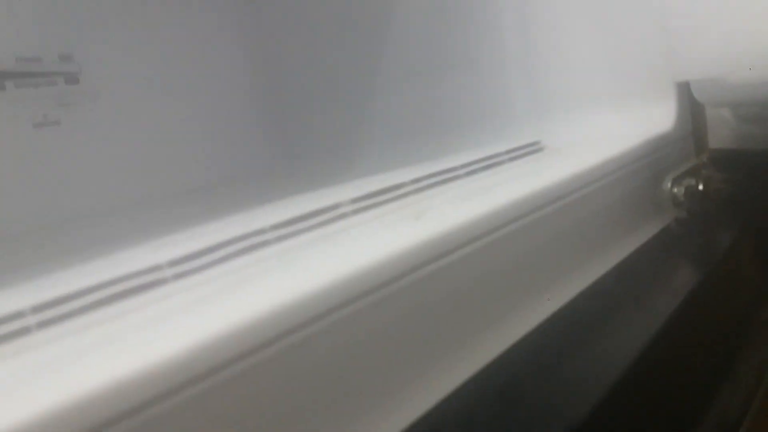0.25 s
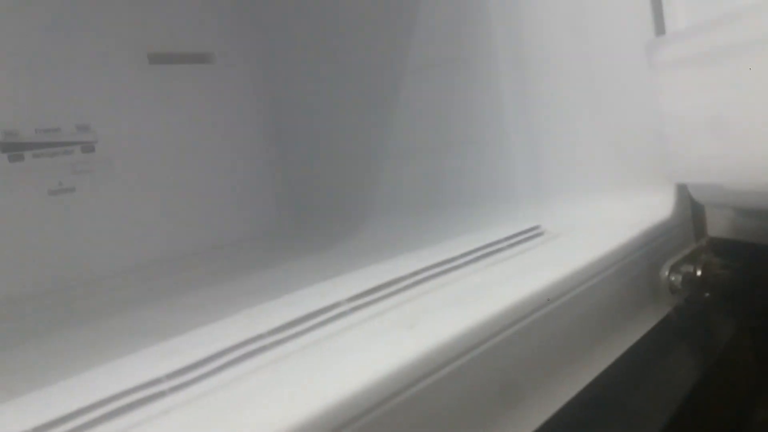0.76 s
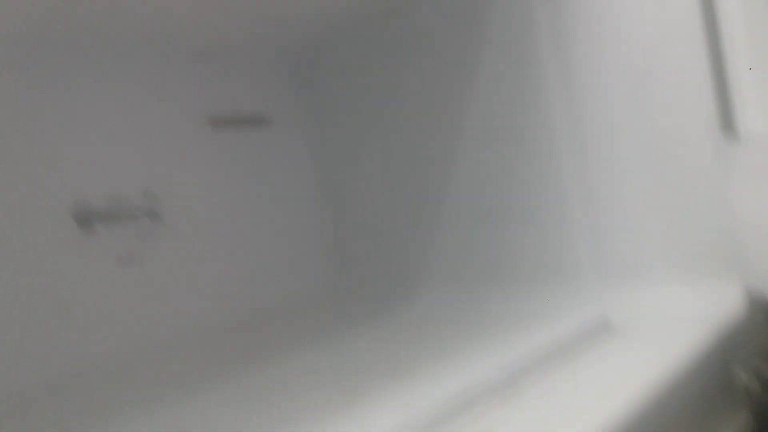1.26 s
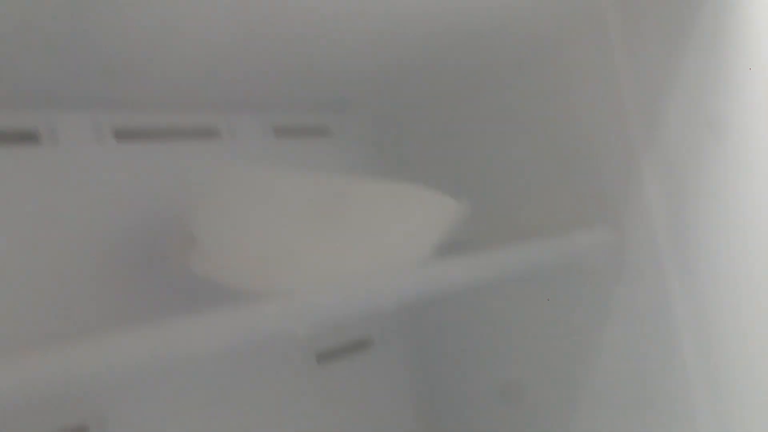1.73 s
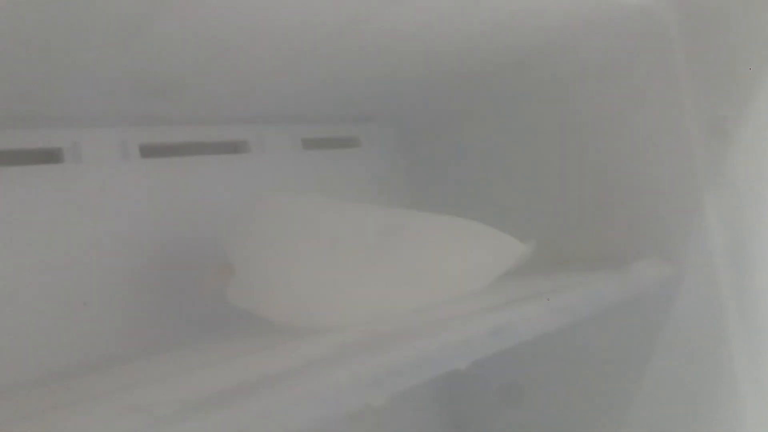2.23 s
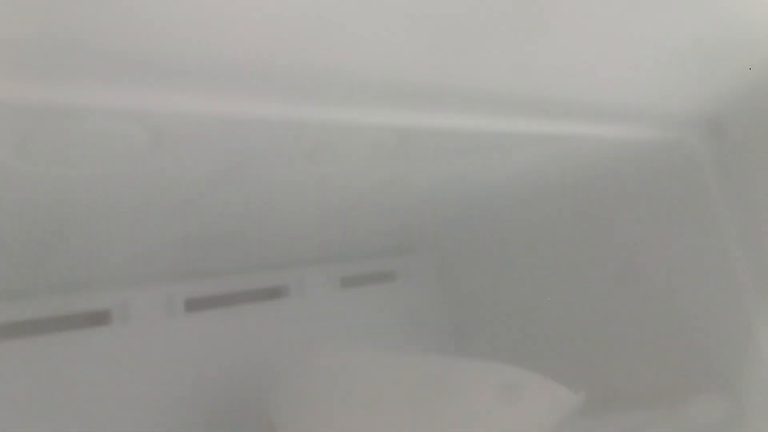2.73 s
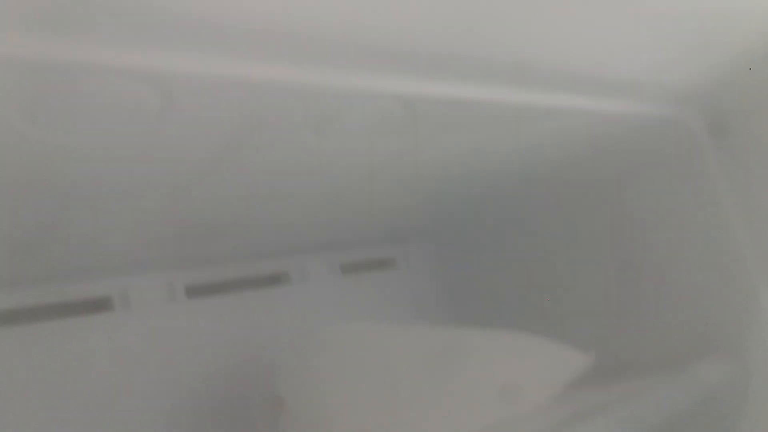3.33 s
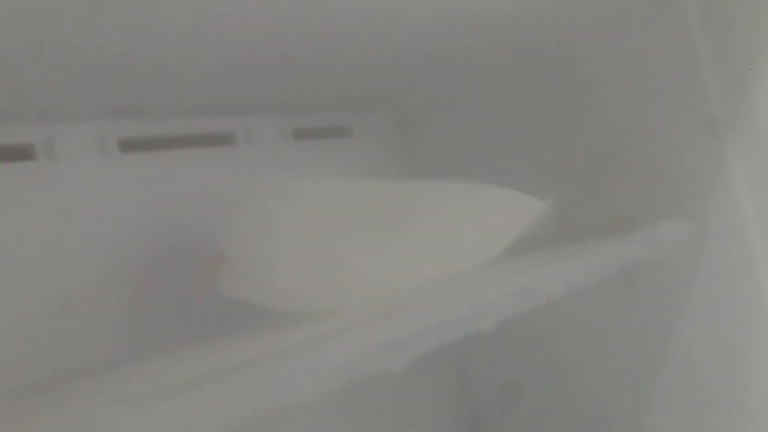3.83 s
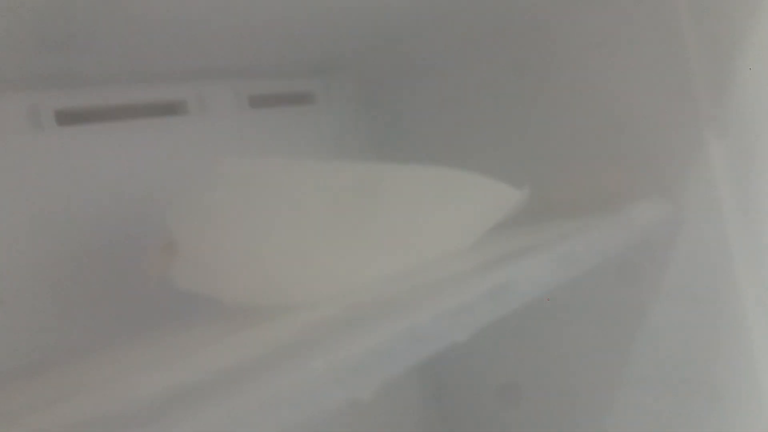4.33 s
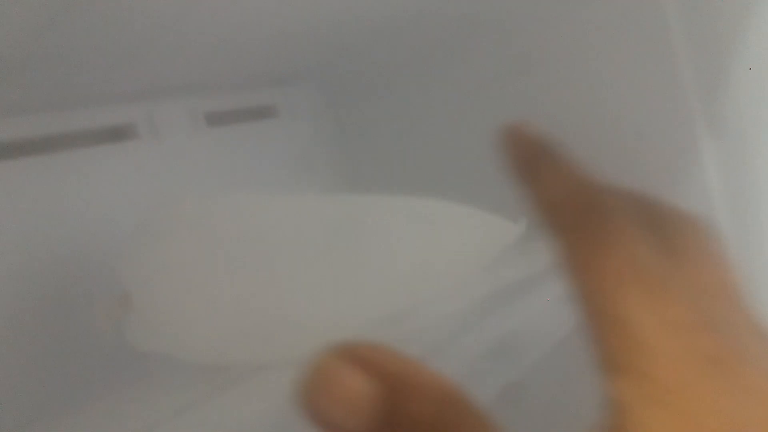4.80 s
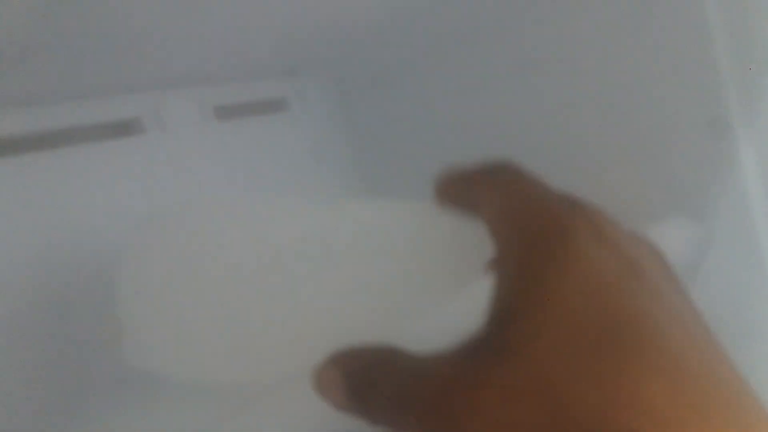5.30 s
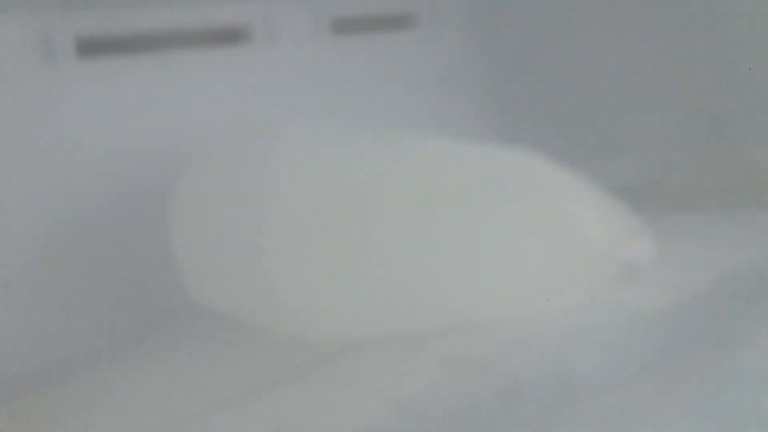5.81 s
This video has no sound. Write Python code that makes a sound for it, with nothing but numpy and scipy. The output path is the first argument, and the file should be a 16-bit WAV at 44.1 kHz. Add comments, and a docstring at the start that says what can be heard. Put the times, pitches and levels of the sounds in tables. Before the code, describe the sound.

A refrigerator hums steadily while plastic clicks and cloth rustles; near the end, a hand crunches frost and knocks a frozen lump against a shelf.

```python
"""A refrigerator's compressor hums through the standing waves of its open cabinet in a kitchen.
A fan drones and pushes rumbling air out of the vents as the listener moves from the door sill
into the freezer box and back. A sleeve rustles by friction with each move, and plastic clicks.
Near the end a hand grips a frozen lump: frost fractures, skin sticks and slips in short squeaks,
and the lump's knocks excite the modes of the shelf."""
import sys
import numpy as np
from scipy import signal
from scipy.fft import rfft, irfft, next_fast_len
from scipy.io import wavfile

SR = 44100
rng = np.random.default_rng(int(sys.argv[2]) if len(sys.argv) > 2 else 0)


def pcm_store(signal):
    """Save signal as 16-bit PCM."""
    levels = np.round(np.clip(np.atleast_2d(signal), -1, 1) * 32767)
    wavfile.write(sys.argv[1], SR, levels.astype(np.int16).T)


N = 267113
TIME = np.arange(N) / SR


def from_db(db):
    """Amplitude ratio of a level in decibels."""
    return 10 ** (np.asarray(db) / 20)


def in_time(rows):
    """Linear interpolation of each column after the time column, sample by sample."""
    times, *columns = np.transpose(rows)
    return [np.interp(TIME, times, column) for column in columns]


def drift(knots_per_s):
    """Random modulation: straight lines between Gaussian values of spread 1."""
    knots = rng.standard_normal(N // 10)
    return np.interp(TIME * knots_per_s, np.arange(len(knots)), knots)


def coloured(excitation, spectrum):
    """Source and filter: a spectral envelope shapes the excitation; the result has rms 1."""
    hz, level_db = np.transpose(spectrum)
    size = next_fast_len(N)
    log_hz = np.log(np.maximum(np.arange(size // 2 + 1) * SR / size, 1))
    gain = from_db(np.interp(log_hz, np.log(hz), level_db, right=-np.inf))
    shaped = irfft(rfft(excitation, size) * gain, size)[:N]
    return shaped / np.sqrt(np.mean(shaped ** 2) + 1e-20)


def noise(spectrum):
    """Filtered Gaussian noise of rms 1."""
    return coloured(rng.standard_normal(N), spectrum)


def decay(start_s, t60_s, rise_s):
    """Exponential decay after a quick rise."""
    age = np.maximum(TIME - start_s, 0)
    return (1 - np.exp(-age / rise_s)) * np.exp(-np.minimum(np.log(1000) * age / t60_s, 20))


def gestures(rows, swell_db=7.5, catch_s=0.016):
    """Incoherent sources add in power: the joint gain of gestures that catch, swell and fade."""
    power = np.zeros(N)
    for start_s, swell_s, peak_db, fade_db_per_s in rows:
        age = np.maximum(TIME - start_s, 0)
        level_db = peak_db - swell_db * np.maximum(1 - age / swell_s, 0)
        level_db -= fade_db_per_s * np.maximum(age - swell_s, 0)
        power += (from_db(level_db) * np.minimum(age / catch_s, 1)) ** 2
    return np.sqrt(power)


# Shaft rotation: time_s, speed_hz
SHAFT_SPEED = [(0, 49.165), (1.2, 49.2), (6.06, 49.222)]
# Harmonics that fill the cabinet: shaft_multiple, sill_level_db
HUM_HARMONICS = [(3, -35.5), (4, -43.5), (6, -61.5), (9, -58), (12, -61.5), (15, -77), (18, -78),
                 (20, -71.5), (21, -68), (22, -70), (26, -76), (27, -73)]
# Standing waves: shaft_multiple (rounded in use), spot_level_db, spot_place, loss_db_per_place
STANDING_WAVES = [(7.986, -45, .1, 2.0), (16.02, -58, .1, -0.3), (23.96, -59.5, 1.08, 9),
                  (28.02, -54, 2.23, 5), (30, -73, 0, 9), (34.2, -71, 1.6, 9), (48, -72.5, 2.1, 7)]

def compressor(place, level_db, waver_db, flutter, inward_db_per_place=1.5):
    """Periodic motion radiates shaft harmonics; standing waves make their levels depend on place."""
    speed_hz, = in_time(SHAFT_SPEED)
    turns = np.cumsum(speed_hz * (1 + flutter * drift(7.97))) / SR
    partials = [(multiple, sill_db + inward_db_per_place * place) for multiple, sill_db in HUM_HARMONICS]
    for multiple, spot_db, spot, loss_db in STANDING_WAVES:
        partials.append((multiple, spot_db - loss_db * np.abs(place - spot)))
    out = np.zeros(N)
    for multiple, here_db in partials:
        amplitude = np.sqrt(2) * from_db(level_db + here_db + waver_db * drift(2.3))
        out += amplitude * np.sin(2 * np.pi * (round(multiple) * turns + rng.random()))
    return out


# Fan tone: time_s, level_db
FAN_DRONE = [(0, -44), (.8, -40.5), (1.3, -41), (1.8, -42.5), (3.3, -43), (3.85, -41.5), (4.15, -37),
             (4.8, -36), (6.06, -36.5)]
# Air from the vents: time_s, rumble_db, rush_db
AIRFLOW = [(0, -39, -45.5), (1.5, -37, -43.5), (2.2, -36.5, -46.5), (3.2, -35.5, -47.5),
           (4.2, -36.5, -46.5), (4.9, -35, -45), (6.06, -31, -42)]
# Spectra of the cabinet's rumble and of the rush at two places: frequency_hz, density_db
RUMBLE_SPECTRUM = [(20, -45), (42, -39), (50, -25.5), (57, -12), (68, -27.5), (90, -26), (102, -17.5),
                   (117, 0), (132, -2), (143, 0), (165, -5), (215, -9.5), (243, -19), (275, -13.5),
                   (370, -20.5), (600, -43)]
SILL_RUSH_SPECTRUM = [(200, -15.5), (290, 3), (400, 0), (530, 3), (620, -9.5), (1000, -11), (1400, -15.5),
                      (1600, -21.5), (2700, -28), (4200, -31), (6200, -27.5), (8000, -40.5), (10000, -48),
                      (16000, -51)]
INNER_RUSH_SPECTRUM = [(200, -11.5), (290, -2.5), (370, 1), (500, -2.5), (620, -4), (1000, -8.5),
                       (1400, -14.5), (2200, -17), (2900, -24.5), (4200, -27), (6200, -25.5), (8000, -36.5),
                       (10000, -47), (16000, -49)]

def fan(place, pitch_hz, waver_db):
    """Rotation gives a tone and airflow broadband noise: a rumble, and a rush brighter near the vents."""
    drone_db, = in_time(FAN_DRONE)
    rumble_db, rush_db = in_time(AIRFLOW)
    drone = from_db(drone_db + waver_db * drift(12)) * np.sqrt(2) * np.sin(2 * np.pi * pitch_hz * TIME)
    inside = np.clip(place, 0, 1)
    rush = np.sqrt(1 - inside) * noise(SILL_RUSH_SPECTRUM) + np.sqrt(inside) * noise(INNER_RUSH_SPECTRUM)
    return drone + from_db(rumble_db) * noise(RUMBLE_SPECTRUM) + from_db(rush_db) * rush


# Sleeve and hand sliding: start_s, swell_s, peak_db, fade_db_per_s
ARM_MOVES = [(-.1, .1, -59.5, 23), (.38, .07, -59.5, 41), (.92, 0.19, -50.5, 13), (1.301, .1, -60, 28),
             (2.145, 0.044, -48.5, 21), (2.34, 0.2, -41, 41), (3.22, 0.18, -46.5, 23.5),
             (3.97, 0.093, -47, 77), (4.18, .07, -41, 70), (5.03, .1, -43, 36), (5.2, 0.22, -38, 67),
             (5.6, 0.14, -51.5, 13), (5.86, 0.025, -48.5, 90)]
# Spectra of the rustle and of the hiss that fast sliding adds: frequency_hz, density_db
RUSTLE_SPECTRUM = [(400, -2.5), (1000, -6.5), (2200, -4.5), (3400, -5), (4600, -3), (5600, 2), (6700, 1),
                   (8000, -7), (10000, -17.5), (13000, -23), (16000, -30)]
SWISH_SPECTRUM = [(1000, -1.5), (2500, -4.5), (4500, -4), (6500, 4), (9000, -1), (12000, -6.5),
                  (16000, -15)]

def sleeve(level_db, catch_db, swish_db, swish_power):
    """Sliding friction: tiny slips of cloth and skin merge into a hiss that brightens with speed."""
    friction = gestures(ARM_MOVES) * from_db(catch_db * drift(120))
    speed = friction / from_db(max(peak_db for _, _, peak_db, _ in ARM_MOVES))
    rustle = from_db(level_db) * noise(RUSTLE_SPECTRUM)
    swish = from_db(swish_db) * speed ** swish_power * noise(SWISH_SPECTRUM)
    return friction * (rustle + swish)


# Snaps of plastic and frost: start_s, strength_db, t60_s, body_share_db, edge_share_db
SNAPS = [(1.3688, -20.5, 0.028, -6, -3), (1.3713, -29.5, 0.032, 5, 1), (2.178, -45.5, .03, -4, 4),
         (3.896, -32.5, 0.032, 3, -6), (4.127, -31.5, 0.035, 2.5, -11), (4.977, -45, 0.044, 6, 2),
         (5.010, -44, 0.032, 1, 10), (5.062, -35, 0.044, 0.5, -11), (5.084, -34, .03, -6, 0),
         (5.092, -30.5, 0.039, -16, 6.5), (5.127, -26, .035, -17, -10), (5.169, -36.5, 0.028, -1, -3),
         (5.2112, -24, 0.037, -10, -15), (5.256, -31, .04, -20, 10), (5.32, -33, 0.069, -8, 4),
         (5.325, -31, 0.063, 1, 6.5), (5.4735, -27, 0.1, -7, 2.5), (5.482, -28.5, 0.076, -3, -6),
         (5.504, -32.5, 0.076, 2, 8), (5.526, -37, 0.056, 10, 0), (5.644, -50, .03, -8, 10),
         (5.794, -33.5, 0.073, -5.5, 3), (5.799, -31.5, 0.061, -2, 0), (5.885, -46.5, 0.033, -4, 7),
         (5.904, -41.5, .03, -2, -1)]
# Spectra of a snap's bright ring, duller body and crisp edge: frequency_hz, density_db
RING_SPECTRUM = [(1500, -21), (3000, -14.5), (4600, -7.5), (5600, 5), (7000, 1.5), (8500, -9.5),
                 (11000, -29), (16000, -40)]
BODY_SPECTRUM = [(200, -22), (350, 3.5), (800, -9.5), (1400, -1), (1800, -2.5), (2300, -11), (3000, -5),
                 (4500, -3.5), (8000, -34)]
EDGE_SPECTRUM = [(5000, -13), (8000, 2), (10000, -1), (12000, -3.5), (16000, -20)]

def clicks(ring_db, body_db, edge_db, chatter_db, rise_s):
    """Modal overlap: chattering contacts excite dense, damped modes that blend into a noise burst."""
    ring_power, body_power, edge_power = np.zeros((3, N))
    for start_s, strength_db, t60_s, body_share_db, edge_share_db in SNAPS:
        snap = from_db(strength_db) * decay(start_s, t60_s, rise_s)
        ring_power += snap ** 2
        body_power += (snap * from_db(body_share_db)) ** 2
        edge_power += (snap * from_db(edge_share_db)) ** 2
    ring = from_db(ring_db) * np.sqrt(ring_power) * noise(RING_SPECTRUM)
    body = from_db(body_db) * np.sqrt(body_power) * noise(BODY_SPECTRUM)
    edge = from_db(edge_db) * np.sqrt(edge_power) * noise(EDGE_SPECTRUM)
    return (ring + body + edge) * from_db(chatter_db * drift(900))


def freezer_box(direct, t60_s, tail_db):
    """Reverberation: reflections from close plastic walls add a short, dense tail."""
    tail = (rng.standard_normal(N) * decay(0.00098, t60_s, rise_s=0.0013))[:SR // 2]
    return direct + from_db(tail_db) * signal.fftconvolve(direct, tail / np.linalg.norm(tail))[:N]


def mode(force, hz, t60_s):
    """Damped resonator: a unit impulse rings at about unit amplitude and radiates no deep bass."""
    radius, angle = from_db(-60 / (t60_s * SR)), 2 * np.pi * hz / SR
    return signal.lfilter([.5, 0, -.5], [1, -2 * radius * np.cos(angle), radius ** 2], force + 1e-18)


# Blows on the shelf: start_s, strength_db, contact_cutoff_hz, favoured_hz (set by the struck spot)
SHELF_BLOWS = [(1.3756, -34, 1500, 380), (5.156, -30.5, 1190, 450), (5.3249, -16.5, 1000, 450),
               (5.333, -33, 1600, 414), (5.456, -28.5, 600, 360), (5.511, -21, 650, 323),
               (5.526, -26.5, 2220, 940), (5.542, -24, 1400, 693), (5.5529, -30.5, 1200, 332)]
# Resonances of the shelf: pitch_hz, level_db, t60_s
SHELF_MODES = [(269, -10, 0.32), (309, -1.5, 0.22), (363.3, 3, 0.2), (389, -7.5, 0.12), (449, 0, 0.1),
               (532, -17, 0.07), (627, -7.5, 0.16), (682, -8, 0.1), (785, -7.5, 0.22), (907, -3, 0.14),
               (997, -3.5, 0.056), (1186, -17, 0.16), (1400, -7, 0.072), (1630, -12, 0.062),
               (1966, 0.5, 0.045)]

def knocks(level_db, favour_db, spread_db, dull_hz):
    """Impact excitation: blows ring the shelf's modes; a soft contact leaves the high ones quiet."""
    start_s, strength_db, contact_hz, favoured_hz = np.transpose(SHELF_BLOWS)
    onsets = np.round(start_s * SR).astype(int)
    scatter_db = spread_db * rng.standard_normal((len(SHELF_BLOWS), len(SHELF_MODES)))
    out = np.zeros(N)
    for k, (hz, mode_db, t60_s) in enumerate(SHELF_MODES):
        spot_db = favour_db * np.exp(-(np.log(hz / favoured_hz) / 0.16) ** 2)
        contact_loss = np.hypot(1, hz / contact_hz)
        force = np.zeros(N)
        force[onsets] = from_db(strength_db + mode_db + spot_db + scatter_db[:, k]) / contact_loss
        out += mode(force, hz, t60_s) * (-1) ** (k // 2)  # mode shapes push or pull the air
    return from_db(level_db) * signal.sosfilt(signal.butter(2, dull_hz, fs=SR, output="sos"), out)


# Fingers pressing into frost: start_s, swell_s, peak_db, fade_db_per_s
FINGER_PRESSES = [(4.975, .2, -53, 25), (5.08, 0.013, -42, 330), (5.215, 0.031, -35, 190),
                  (5.315, 0.011, -42, 88), (5.473, .03, -46.5, 300)]
# Spectrum of the crunch: frequency_hz, density_db
CRUNCH_SPECTRUM = [(1200, -19), (2800, -4), (4500, -5), (6500, 8), (8500, -2), (11000, -9), (16000, -20)]

def frost(grains_per_s, size_spread_db, clump_db):
    """Brittle fracture: pressed crystals break as random impulses, in clumps, a few larger than most."""
    sizes = from_db(size_spread_db * np.minimum(rng.exponential(1, N), 3)) * rng.choice([-1, 1], N)
    breaks = sizes * (rng.random(N) < grains_per_s / SR)
    return gestures(FINGER_PRESSES) * from_db(clump_db * drift(160)) * coloured(breaks, CRUNCH_SPECTRUM)


# Fingers slipping on frost: start_s, level_db, pitch_hz, t60_s
FINGER_SLIPS = [(5.221, -31, 3150, .05), (5.236, -31, 3000, .06), (5.479, -33, 2260, .13)]

def squeaks(width_hz, rough_db):
    """Stick-slip oscillation: skin catches and releases on frost in a short, rough tone."""
    out = np.zeros(N)
    for start_s, level_db, pitch_hz, t60_s in FINGER_SLIPS:
        cycles = np.cumsum(pitch_hz + width_hz * drift(2000)) / SR
        envelope = from_db(level_db + rough_db * drift(1200)) * decay(start_s, t60_s, rise_s=0.0015)
        out += envelope * np.sqrt(2) * np.sin(2 * np.pi * cycles)
    return out


# Listening position: time_s, place (0 door sill, 1 mouth of the freezer box, 2 inside)
LISTENER_PATH = [(0, 0.12), (1.2, 0.028), (2.1, 0.63), (3.2, 1.17), (4.1, 1.63), (4.6, 1.8), (5.4, 1.6),
                 (6.06, 0.43)]

def scene():
    """Superposition: the running machine, the handling sounds in the freezer box and the sleeve."""
    place, = in_time(LISTENER_PATH)
    hum = compressor(place, level_db=0.22, waver_db=-0.35, flutter=0.00014)
    air = fan(place, pitch_hz=69.35, waver_db=0.55)
    rustle = sleeve(level_db=-1.0, catch_db=1.0, swish_db=-8.0, swish_power=0.7)
    handling = clicks(ring_db=2.5, body_db=-1.0, edge_db=-9.5, chatter_db=-0.5, rise_s=0.00035)
    handling += knocks(level_db=-7.0, favour_db=6, spread_db=2.7, dull_hz=2380)
    handling += frost(grains_per_s=1800, size_spread_db=2.5, clump_db=4.5)
    handling += squeaks(width_hz=380, rough_db=2.0)
    return (hum + air + rustle + freezer_box(handling, t60_s=0.17, tail_db=-12))[None]


def record(dry):
    """Band limiting: a steep elliptic low-pass cuts the treble above 16 kHz."""
    return signal.sosfilt(signal.ellip(12, .1, 90, 16000, fs=SR, output="sos"), dry)


dry = scene()
out = record(dry)
pcm_store(out)
```